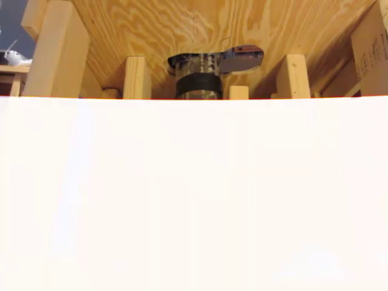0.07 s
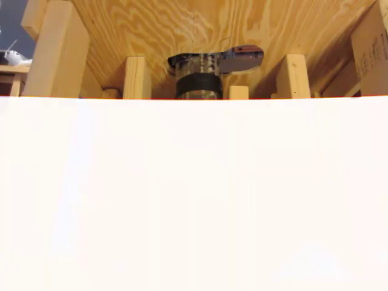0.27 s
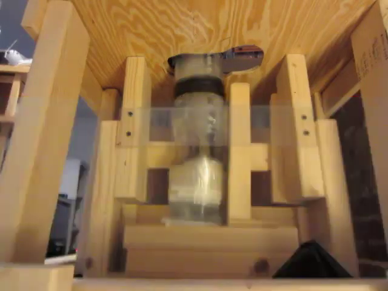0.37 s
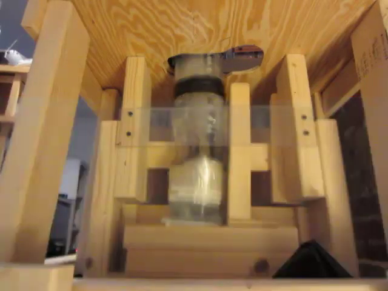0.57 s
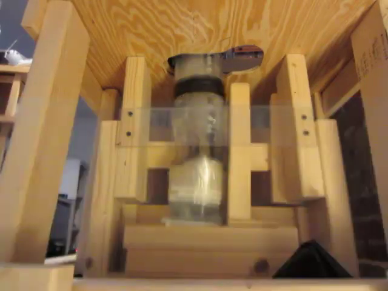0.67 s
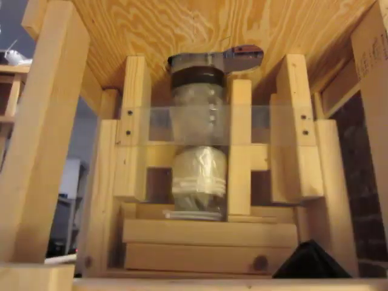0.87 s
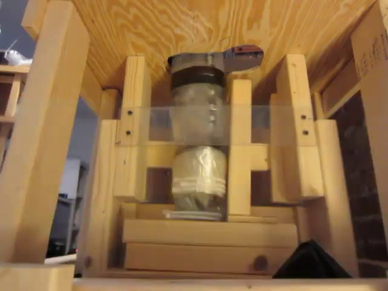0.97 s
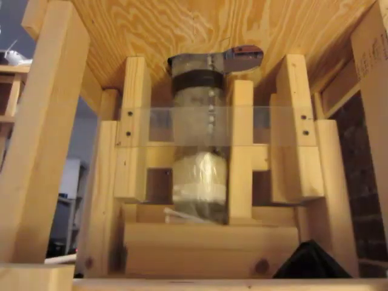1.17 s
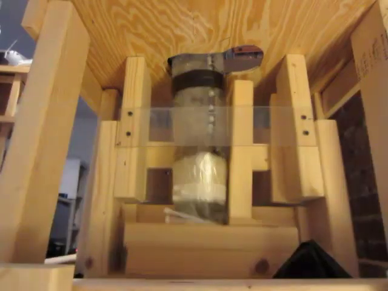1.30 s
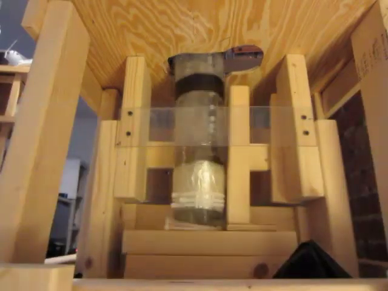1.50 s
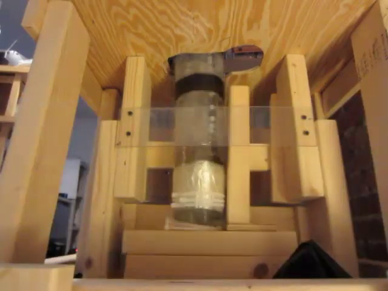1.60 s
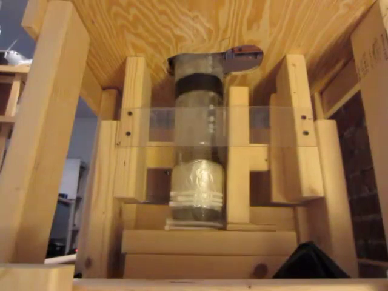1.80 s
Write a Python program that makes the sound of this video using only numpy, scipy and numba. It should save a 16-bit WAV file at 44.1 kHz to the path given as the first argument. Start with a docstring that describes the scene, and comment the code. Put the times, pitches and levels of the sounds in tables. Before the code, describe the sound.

A deep, slowed-down electrical bang hits at about 0.3 seconds, after a low workshop hum and rumble. It rings a wooden box and overloads the microphone, with a gritty buzz on top. Short, deep booms follow until about 0.9 seconds as the echo slowly fades. From about 1.3 to 1.8 seconds, loosened parts settle with several soft, dull knocks.

```python
"""A high-voltage discharge bangs in a glass tube inside a wooden box, heard ten times slowed down.
The blast rings the box, overloads the microphone and rolls away in the room with short, deep booms.
Loosened parts knock as they settle, over workshop hum and a deep rumble. Gain control ducks after
the crack, and the slowed playback holds every sample, which lays a gritty buzz over the boom.
All times and frequencies are as heard, already slowed."""
import sys
import numpy as np
from scipy import signal
from scipy.fft import rfft, irfft
from scipy.io import wavfile
from numba import njit

SR = 44100
rng = np.random.default_rng(int(sys.argv[2]) if len(sys.argv) > 2 else 0)


def master(y):
    """Save y as 16-bit WAV."""
    cut = np.clip(np.atleast_2d(y).T, -1, 1)
    pcm = np.round(cut * 32767)  # scale
    wavfile.write(sys.argv[1], SR, pcm.astype(np.int16))


N = 81585
T = np.arange(N) / SR
FREQS = np.maximum(np.fft.rfftfreq(N, 1 / SR), 1)
BANG_S = 0.316
AGE_S = np.maximum(T - BANG_S, 0)


def undb(db):
    """Decibels to gain."""
    return 10 ** (np.asarray(db) / 20)


def on_log_axis(freqs, hz, values):
    """Linear interpolation over log frequency."""
    return np.interp(np.log(freqs), np.log(hz), values)


def noise(gain):
    """Unit-rms noise with the given relative gain per frequency."""
    x = irfft(gain * np.exp(2j * np.pi * rng.random(len(FREQS))), N)
    return x / x.std()


def shaped_noise(points):
    """Unit-rms noise with a spectrum through (f/Hz, level/dB) points."""
    hz, db = np.array(points).T[:2]
    return noise(undb(on_log_axis(FREQS, hz, db)))


def colour(x, points, size=4096):
    """Minimum-phase filter through (f/Hz, gain/dB) points."""
    hz, db = np.array(points).T
    freqs = np.maximum(np.fft.rfftfreq(size, 1 / SR), 1)
    cepstrum = irfft(np.log(undb(on_log_axis(freqs, hz, db))))
    cepstrum[1:size // 2] *= 2
    cepstrum[size // 2 + 1:] = 0
    impulse = irfft(np.exp(rfft(cepstrum)))
    return signal.fftconvolve(x, impulse)[:N]


def low_pass(x, hz):
    """Steep zero-delay low-pass."""
    return signal.fftconvolve(x, signal.firwin(401, hz, fs=SR, window="blackman"), "same")


@njit
def follow(x, level, attack_s, release_s):
    """Level follower with separate attack and release."""
    out = np.empty(len(x))
    for i in range(len(x)):
        gap = abs(x[i]) - level
        level += gap / (SR * (attack_s if gap > 0 else release_s))
        out[i] = level
    return out


# f/Hz, relative density/dB
HUM_SPECTRUM = [(25, 2), (70, -2.5), (150, -5.5), (300, -20), (500, -28), (800, -30.5), (1100, -33.5),
                (2000, -35.5)]

def workshop_hum(level_db=-27):
    """Steady low noise of the workshop."""
    return undb(level_db) * shaped_noise(HUM_SPECTRUM)


# f/Hz, relative density/dB
RUMBLE_SPECTRUM = [(12, 2.5), (24, -3), (42, -7), (70, -22.5), (150, -44), (600, -93.5)]
# t/s, level/dB
RUMBLE_ENVELOPE = [(0, -11), (.08, -36.5), (.14, -22), (.29, -9.5), (.6, -24), (1.85, -26)]

def rumble():
    """Deep noise that dips, grows toward the bang and falls back."""
    at_s, db = np.array(RUMBLE_ENVELOPE).T
    return shaped_noise(RUMBLE_SPECTRUM) * undb(np.interp(T, at_s, db))


# t/s, level/dB, centre/Hz, width/Hz, rise/s, decay/s
PART_KNOCKS = [(1.349, -17, 574, 306, 0.026, 0.028), (1.323, -9.5, 135, 265, 0.008, 0.053),
               (1.457, -23, 170, 196, 0.0092, 0.022), (1.549, -13, 211.6, 195, 0.026, 0.032),
               (1.618, -9.5, 120, 227, 0.0085, 0.015), (1.646, -12, 175, 175, 0.0062, .028),
               (1.78, -15, 71.4, 45, 0.042, 0.061)]

def knocks():
    """Jolted parts land; each contact is drawn out into a short rattle around one resonance."""
    out = np.zeros(N)
    for at_s, db, hz, width_hz, rise_s, decay_s in PART_KNOCKS:
        resonance = 1 / (1 + ((FREQS ** 2 - hz ** 2) / (FREQS * width_hz)) ** 4)
        envelope = np.exp(-np.maximum((at_s - T) / rise_s, (T - at_s) / decay_s))
        out += undb(db) * envelope * noise(resonance)
    return out


# t/s, level/dB, f/Hz, half length/s
TAIL_BOOMS = [(.41, 3.5, 132, 0.005), (.475, 10.5, 73, 0.012), (.56, -11, 214, .018),
              (0.625, 0.5, 74.7, 0.026), (.76, -8.5, 172.3, .022), (.885, -12.5, 55, 0.013)]

def booms():
    """Short, deep swells in the tail, as if the pressure wave came back from the walls."""
    out = np.zeros(N)
    for at_s, db, hz, half_s in TAIL_BOOMS:
        envelope = np.exp(-((T - at_s) / half_s) ** 2)
        out += undb(db) * envelope * np.cos(2 * np.pi * hz * (T - at_s))
    return out


# f/Hz, relative density/dB, t60/s
REVERB_BANDS = [(22.4, -8, 4.2), (44.7, -1.5, 3.7), (80, -11, 8.8), (118, -7.5, 5.3), (248.4, -7.5, 3.73),
                (430, -19.5, 4.9), (746, -22, 4.26), (1134, -23, 1.82)]

def room_reverb(level_db=0.5, build_s=0.049):
    """Diffuse echoes build up and die away, the treble first."""
    hz, _, t60s = np.array(REVERB_BANDS).T
    spectrum = rfft(shaped_noise(REVERB_BANDS))
    tail = np.zeros(N)
    for weights, t60_s in zip(np.eye(len(hz)), t60s):
        band = irfft(spectrum * on_log_axis(FREQS, hz, weights), N)
        tail += band * undb(-60 * AGE_S / t60_s)
    return undb(level_db) * (1 - np.exp(-AGE_S / build_s)) * tail


# modes of box and tube: f/Hz, relative level/dB, t60/s
BOX_MODES = [(69.1, -9.5, 0.92), (73.3, -13.5, 0.34), (91.1, 0, .12), (148.7, 3, 0.1), (214.8, 20, 0.028),
             (285.8, -4.5, 0.15), (392.6, -15.5, 0.084), (452, -18, 0.13), (721.3, -7.5, 0.095)]

def box_ring(gain_db=8.5):
    """The blast sets box and tube ringing in damped modes."""
    modes = (undb(db - 60 * AGE_S / t60_s) * np.sin(2 * np.pi * hz * AGE_S)
             for hz, db, t60_s in BOX_MODES)
    return -undb(gain_db) * sum(modes)


def swell_and_crack(swell_db=-6.5, swell_s=0.022, burst_db=0.5, decay_s=0.044):
    """The sound swells briefly just before the crack; then the spark's burst of turbulent air."""
    swell = undb(swell_db) * np.exp(-((T - BANG_S) / swell_s) ** 2)
    burst = undb(burst_db) * np.exp(-AGE_S / decay_s)
    return np.where(T < BANG_S, swell, burst) * shaped_noise(REVERB_BANDS)


def scene():
    """Mono mix of the bang, knocks and background."""
    bang = swell_and_crack() + box_ring() + room_reverb() + booms()
    return (bang + knocks() + workshop_hum() + rumble())[None]


# f/Hz, gain/dB
MIC_RESPONSE = [(20, 2), (700, 3), (950, -0.5), (1060, -5.5), (1160, -10.5), (1350, -11), (1720, -11),
                (1950, -17), (2150, -36.5)]

def microphone(pressure, ceiling=1.7, bias=-0.0079):
    """The microphone colours the sound and saturates, slightly lopsided."""
    drive = colour(pressure, MIC_RESPONSE) / ceiling
    return ceiling * (np.tanh(drive + bias) - np.tanh(bias))


def gain_control(x, threshold=0.27, ratio=3.29, lag_s=0.011):
    """The gain ducks above the threshold, slightly late, and recovers slowly."""
    level = follow(x, threshold, attack_s=0.094, release_s=8.1)
    late_level = np.interp(T - lag_s, T, level)
    return x * np.minimum(threshold / late_level, 1) ** (1 - 1 / ratio)


def sample_hold(x, hold_samples=10):
    """Slowed playback holds each sample; the steps buzz."""
    return np.repeat(x[::hold_samples], hold_samples)[:N]


def record(dry, trim_db=-3):
    """The microphone saturates, the gain ducks, peaks clip and playback holds each sample."""
    ducked = undb(trim_db) * gain_control(microphone(dry[0]))
    clipped = np.clip(low_pass(ducked, hz=2050), -1, 1)
    return low_pass(sample_hold(clipped), hz=10800)[None]


dry = scene()
out = record(dry)
master(out)
```